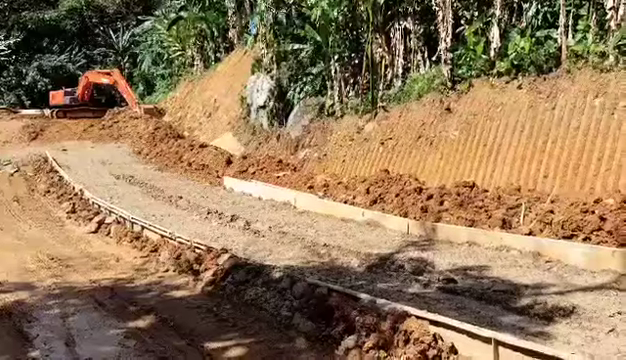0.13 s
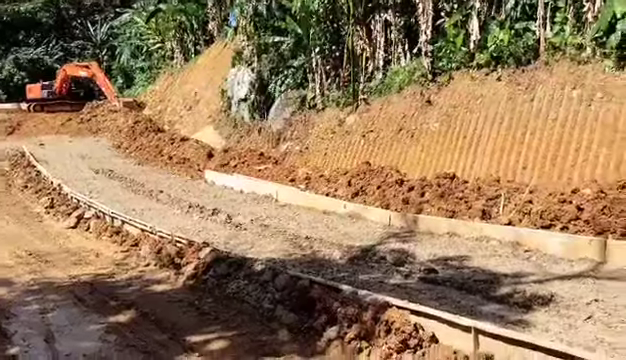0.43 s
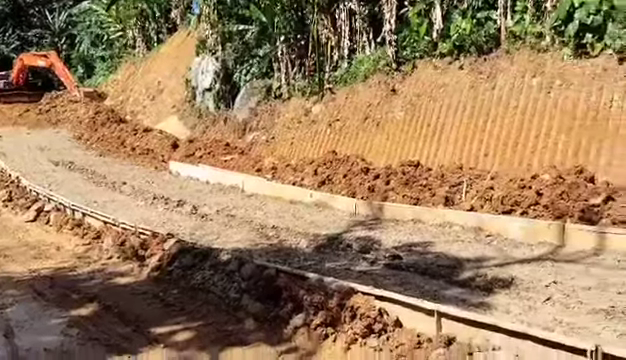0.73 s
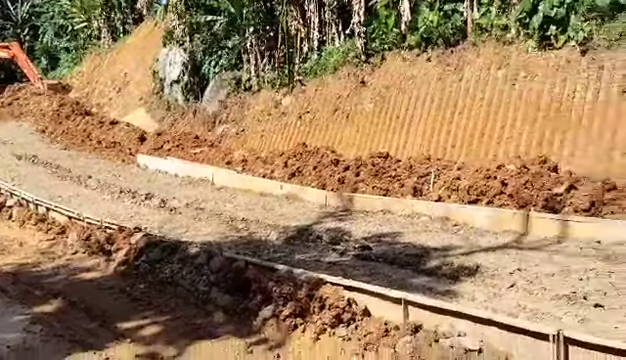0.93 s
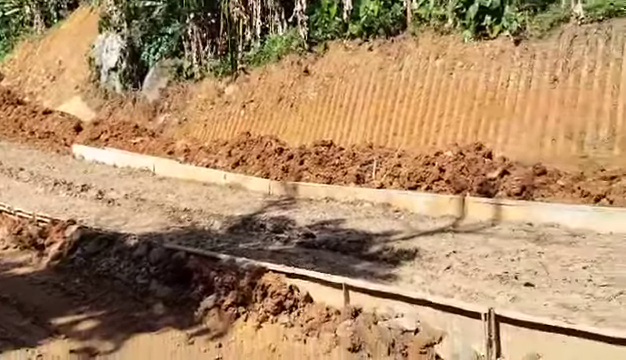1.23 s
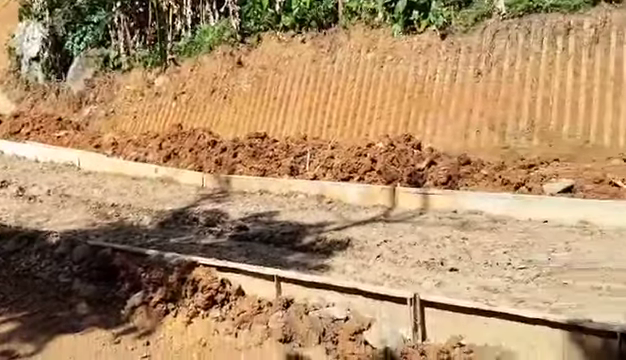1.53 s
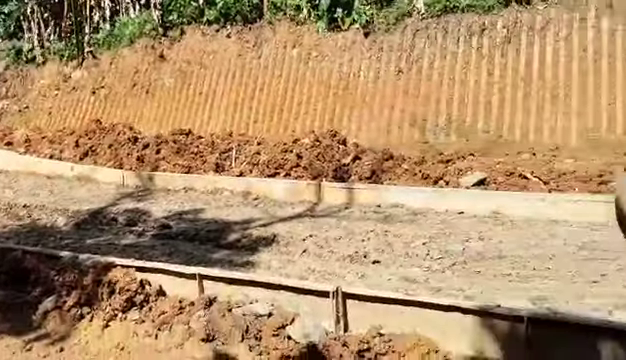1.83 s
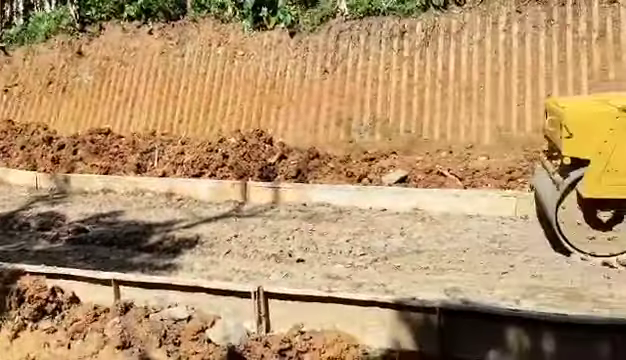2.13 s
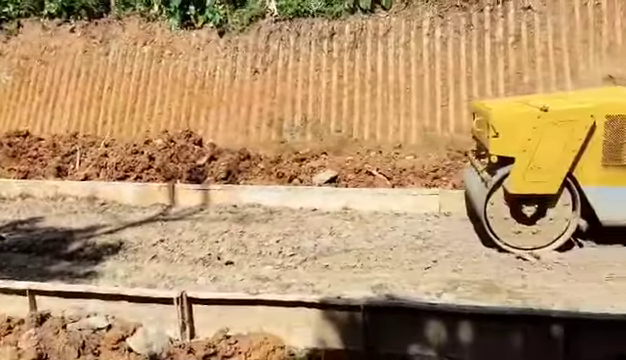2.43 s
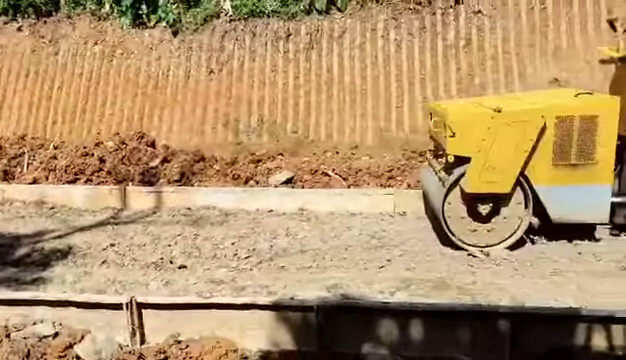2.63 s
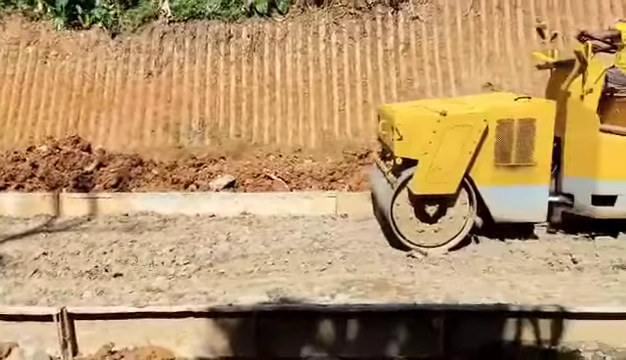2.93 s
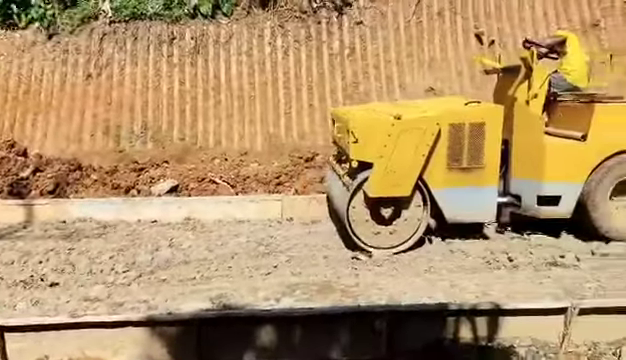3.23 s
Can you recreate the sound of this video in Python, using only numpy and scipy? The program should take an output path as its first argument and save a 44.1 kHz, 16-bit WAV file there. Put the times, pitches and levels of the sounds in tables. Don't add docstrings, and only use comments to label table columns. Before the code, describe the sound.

Heavy roller engine hums low and rough at constant speed, with clatter, whine and stone cracks.

```python
import sys
import numpy as np
from scipy import signal
from scipy.fft import rfft, irfft, next_fast_len
from scipy.io import wavfile
from scipy.ndimage import uniform_filter1d, map_coordinates

SR = 44100
rng = np.random.default_rng(int(sys.argv[2]) if len(sys.argv) > 2 else 0)


def gain_from_db(level_db):
    decades = np.asarray(level_db, float) / 20
    return 10 ** decades


def wav_record(signal):
    frames = np.transpose(np.atleast_2d(signal))
    bounded = np.clip(frames, -1, 1)
    quanta = np.round(bounded * 32767).astype(np.int16)
    wavfile.write(sys.argv[1], SR, quanta)


N = 149499


def unit(x):
    return x / np.sqrt(np.mean(x ** 2) + 1e-20)


def along(points, hz):
    f, v = np.transpose(points)
    return np.interp(np.log(hz + 1), np.log(f + 1), v)


def curve(rows):
    return np.interp(np.arange(N) / SR, *np.transpose(rows))


def wobble(rate):
    return map_coordinates(rng.standard_normal(200), [np.arange(N) * rate / SR % 190])


def filtered(x, response):
    m = next_fast_len(N + SR // 2)
    return irfft(rfft(x, m) * response(np.fft.rfftfreq(m, 1 / SR)), m)[..., :N]


def resonance(f, hz, width_hz):
    return 1j * f * width_hz / (hz * hz - f * f + 1j * f * width_hz)


def rush(spectrum, patchy_db, gate=1, channels=1):
    z = signal.stft(rng.standard_normal((channels, N)), nperseg=512)[2]
    field = rng.standard_normal(z.shape[1:])
    field = uniform_filter1d(uniform_filter1d(field, size=8, axis=0), size=8, axis=1)
    x = signal.istft(z * gain_from_db(patchy_db * unit(field)), nperseg=512)[1][:, :N]
    return unit(filtered(x * gate, lambda hz: gain_from_db(along(spectrum, hz))))


# time [s], firing rate [Hz].
FIRING_RATE = [(.1, 56.7), (.3, 56.74), (.5, 56.8), (.7, 56.99), (.9, 56.96), (1.1, 57.18), (1.3, 57.08),
               (1.5, 57.45), (2.1, 57.5), (2.3, 57.64), (2.5, 57.62), (2.7, 57.36), (2.9, 57.08),
               (3.1, 57.2), (3.39, 57.6)]


def firing():
    start_turns = .3
    return 2 * np.pi * (np.cumsum(curve(FIRING_RATE)) / SR + start_turns)


# time [s], turn towards the roller [0-1].
FACING = [
    (.1, 0),
    (.9, 0.09),
    (1.5, 0.29),
    (2.1, 0.51),
    (2.5, 0.63),
    (2.9, 0.94),
    (3.39, 0.97),
]
ORDERS = [1, 2, 3, 4, 5, 6, 7, 8, 9, 10, 11, 12, 14, 15, 16, 18]
# level [dB rms] turned away, half turned, nearly facing, facing.
ORDER_LEVELS = [(-32, -37, -35, -35.5), (-25.5, -32, -33.5, -34), (-21.5, -18, -21, -21),
                (-23.5, -22.5, -24, -20), (-36, -38, -40.5, -39), (-33, -47.5, -37, -50),
                (-81, -43.5, -38, -42.5), (-37, -45, -40, -42), (-76, -51, -40, -42), (-72, -42, -35, -47),
                (-38, -31, -31, -30), (-38, -24.5, -25.5, -30), (-45, -42, -69, -65), (-36, -47, -81, -51),
                (-40, -48.5, -30.5, -44), (-55, -47, -41, -43)]
TURN_STEPS = [0, .4, .9, 1]
# multiple of the engine cycle [ratio], level [dB rms].
UNEVEN_ORDERS = [(2, -75), (4, -73.5), (5, -52.5), (7, -51), (8, -43.5), (10, -48), (11, -66.5), (13, -39),
                 (22, -53), (25, -47), (26, -69), (28, -52), (29, -69), (34, -44), (35, -53.5)]
# resonance [Hz], width [Hz].
CHAMBERS = [(150, 12), (200, 55), (400, 60)]


def exhaust():
    lead_rad, jitter_rad = .14, .015
    sway_db, sway_rate = 0.45, 7.08
    phase = firing() + jitter_rad * wobble(29) + lead_rad
    turn, rate = curve(FACING), np.mean(curve(FIRING_RATE))

    def chamber_lag(f):
        return sum(np.angle(hz * hz - f * f + 1j * f * width) for hz, width in CHAMBERS)

    even = 0
    for k, levels in zip(ORDERS, ORDER_LEVELS):
        level_db = np.interp(turn, TURN_STEPS, levels) + sway_db * k ** .5 * wobble(sway_rate)
        even = even - gain_from_db(level_db) * np.cos(k * phase - chamber_lag(k * rate))
    uneven = 0
    for k, db in UNEVEN_ORDERS:
        angle = k * phase / 3 + wobble(5.55) + k * k
        uneven = uneven + gain_from_db(db + 2.9 * wobble(5.7)) * np.cos(angle)
    return np.sqrt(2) * (even + uneven)


def gate(depth, lag_turns):
    cycle_depth = 0.073
    p = firing() - 2 * np.pi * lag_turns
    pulse = np.cos(p) + 0.5 * np.cos(2 * p)
    return np.exp(depth * (1 + .5 * wobble(15)) * pulse + cycle_depth * np.cos(p / 3))


# frequency [Hz], density [dB per Hz].
ROAR_SPECTRUM = [(18, -30), (45, -6), (100, -5), (220, 1.5), (320, -9.5), (560, -1), (800, -3),
                 (1500, -55.5)]
# frequency [Hz], density [dB per Hz].
CLATTER_SPECTRUM = [(600, -25), (950, 4), (1400, 0), (2100, 0.5), (2900, -11), (4500, -11), (7000, -18.5),
                    (13400, -40)]


def casing():
    turn = curve(FACING)
    roar_db = -30.5 + 1.5 * turn + 0.4 * wobble(4.3)
    clatter_db = -34 + 2.5 * turn + 0.69 * wobble(6.1)
    roar = gain_from_db(roar_db) * rush(ROAR_SPECTRUM, 1, gate(0.1, 0.67))
    clatter = gain_from_db(clatter_db) * rush(CLATTER_SPECTRUM, 0.95, gate(0.27, 0.36))
    return (roar + clatter)[0]


GEARING = [20.68, 24, 32, 40, 64, 80, 88, 96]
# level [dB rms] turned away, half turned, nearly facing, facing.
WHINE_LEVELS = [(-35, -34, -37, -35), (-49, -44, -46, -47), (-43, -49, -45, -43), (-43.5, -40.5, -46, -43),
                (-57, -49, -53, -51), (-52, -57, -52, -56), (-55, -58, -60, -57), (-51, -70, -61, -59)]
# left-right level [dB] and left lead [rad] turned away, the same facing.
WHINE_PORTS = [(3.5, -3.8, 6, -1.1), (4, -4.1, 3, -1.4), (-3, -6.3, 4, -1.4), (-5, -7.9, -7, -1.7),
               (0, -12, 6, -2.7), (0, -13, 6, -3), (0, -13, 0, -3), (0, -13, 0, -3)]


def whine():
    flutter_db, blur_rad = 3, .014
    turn, sides = curve(FACING), np.array([[.5], [-.5]])
    tones = 0
    for k, levels, (away_db, away_rad, facing_db, facing_rad) in zip(GEARING, WHINE_LEVELS, WHINE_PORTS):
        level_db = np.interp(turn, TURN_STEPS, levels) + flutter_db * wobble(12)
        tilt_db = sides * (away_db + (facing_db - away_db) * turn)
        lead = sides * (away_rad + (facing_rad - away_rad) * turn)
        angle = k * firing() + blur_rad * k * wobble(25) + lead
        tones = tones + gain_from_db(level_db + tilt_db) * np.sin(angle)
    return np.sqrt(2) * tones


# start [s], peak level [dB].
STONES = [
    (1.929, -15.5),
    (2.032, -22),
    (2.085, -15),
    (2.948, -17.5),
]
# frequency [Hz], density [dB per Hz].
STONE_SPECTRUM = [(400, -32), (800, 5), (2400, -8), (6000, -35), (12000, -49)]


def stones():
    t60_s, trim_db = .03, -4
    t = np.arange(N) / SR
    bursts = sum(gain_from_db(db + trim_db - 60 * abs(t - s) / t60_s) * (t > s) for s, db in STONES)
    return rush(STONE_SPECTRUM, 0)[0] * bursts


# frequency [Hz], density [dB per Hz].
AIR_SPECTRUM = [(600, -8.5), (1000, -15.5), (1500, -5), (2200, -7), (2900, -9), (5800, -14.5), (10800, -17),
                (13400, -27)]
# frequency [Hz], density [dB per Hz].
GROUND_SPECTRUM = [(18, -26.5), (50, 1), (90, 4), (200, -0.5), (450, 6), (900, -29), (1500, -58.5)]


def scattered():
    air_db = -31.5 + 3 * curve(FACING) + 0.85 * wobble(7.44)
    air = gain_from_db(air_db) * rush(AIR_SPECTRUM, 2.14, gate(0.1, 0.31), channels=2)
    return air + gain_from_db(-44) * rush(GROUND_SPECTRUM, 1, channels=2)


# centre time [s], level [dB].
PUFFS = [
    (2.37, -25),
    (2.441, -23),
    (3.15, -30),
]


def puffs():
    hz, width_hz, length_s, right_db = 100, 110, .03, -9
    t = np.arange(N) / SR
    low = unit(filtered(rng.standard_normal(N), lambda f: resonance(f, hz, width_hz) ** 2))
    thuds = low * sum(gain_from_db(db) * np.exp(-((t - s) / length_s) ** 2) for s, db in PUFFS)
    return thuds * gain_from_db([[0], [right_db]])


# time [s], firing note [Hz].
FAR_NOTE = [(0, 50.7), (1.4, 50.72), (1.7, 51.1), (2.6, 51.2), (2.9, 50.85), (3.39, 50.85)]


def far_machine():
    level_db, start_turns = -43 + .6 * wobble(3.8), 0.72
    turns = np.cumsum(curve(FAR_NOTE)) / SR + start_turns
    return np.sqrt(2) * gain_from_db(level_db) * np.sin(2 * np.pi * turns)


# frequency [Hz], share of the full lag [0-1].
LAG_SHARE = [(150, .133), (330, .5), (680, .7), (920, .9), (1100, 1), (2300, 1), (12000, .8)]
# frequency [Hz], left-right level [dB].
SHADE_AWAY = [(150, 1.5), (600, 0.5), (1150, 8.5), (2400, -2), (4500, -3), (7000, 8.5), (8800, -4.5),
              (11500, -5)]
# frequency [Hz], left-right level [dB].
SHADE_MIDWAY = [(150, 1), (600, 2), (1150, 6.5), (2400, -6), (4500, 2.5), (7000, -1), (8800, -13.5),
                (11500, -3)]
# frequency [Hz], left-right level [dB].
SHADE_TOWARD = [(150, 0.8), (600, 1), (1150, 1), (2400, -1.5), (4500, 3), (7000, 4.5), (8800, -17),
                (11500, 10.5)]


def ports(x, lagged=1):
    lag_s, lag_left = .00052, .27
    hz, t, z = signal.stft(x, SR, nperseg=1024, noverlap=768)
    turn = np.clip(np.interp(t, *np.transpose(FACING)), 0, 1)
    away, midway, toward = np.clip(1 - 2 * turn, 0, 1), 1 - abs(1 - 2 * turn), np.clip(2 * turn - 1, 0, 1)
    shades = (SHADE_AWAY, away), (SHADE_MIDWAY, midway), (SHADE_TOWARD, toward)
    tilt_db = sum(np.outer(along(shade, hz), weight) for shade, weight in shades) / 2
    lag = lagged * np.pi * np.outer(hz * along(LAG_SHARE, hz), lag_s * (1 - (1 - lag_left) * turn))
    side = gain_from_db(tilt_db) * np.exp(-1j * lag)
    return signal.istft(z * np.array([side, 1 / side]), SR, nperseg=1024, noverlap=768)[1][:, :N]


def scene():
    roller = ports(exhaust() + casing() + stones()) + whine()
    return roller + ports(scattered(), lagged=0) + far_machine() + puffs()


# frequency [Hz], threshold against the neighbourhood [dB].
HOLES = [(800, -22), (1250, -10), (3200, -8), (4600, -3), (5600, -2), (7500, -4), (9500, -8), (12900, -1)]


def starved(x):
    depth_db, opens_db = -30, 4
    hz, t, z = signal.stft(np.array([x[0] + x[1], x[0] - x[1]]) / 2, SR, nperseg=2048)
    power = abs(z[:, :1024]) ** 2 + 1e-20
    cell = np.repeat(power.reshape(2, 128, 8, -1).mean(axis=2), 8, axis=1)
    near = uniform_filter1d(uniform_filter1d(power.mean(axis=0), size=90, axis=0), size=12, axis=1)
    under_db = 10 * np.log10(abs(cell / near) + 1e-9) - along(HOLES, hz[:1024])[:, None]
    under_db -= opens_db * (np.interp(t, *np.transpose(FACING)) - .5)
    z[:, :1024] *= gain_from_db(depth_db * np.clip(.5 - under_db, 0, 1))
    mid, side = signal.istft(z, SR, nperseg=2048)[1][:, :N]
    return np.array([mid + side, mid - side])


def roll_off(x):
    return signal.sosfilt(signal.butter(12, 13520, fs=SR, output="sos"), x)


def record(dry):
    start_s, fade_from_s, fade_s = 0.0736, 0.047, 0.35
    bass_hz, bass_joins_s, bass_held_db = 132, 0.186, -10.5
    t = np.arange(N) / SR
    fade = np.clip((t - fade_from_s) / (fade_s - fade_from_s), 0, 1) ** 0.93
    fade = fade * np.clip((t - start_s) / 0.021, 0, 1)
    bass = filtered(dry, lambda hz: 1 / (1 + (hz / bass_hz) ** 6))
    held = (1 - gain_from_db(bass_held_db)) * np.clip((bass_joins_s - t) / 0.0097, 0, 1)
    limited = filtered(dry - bass * held, lambda hz: hz < 13150)
    return roll_off(starved(limited) * fade)


dry = scene()
out = record(dry)
wav_record(out)
```